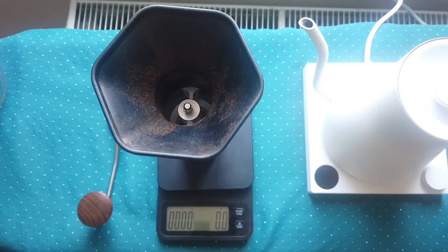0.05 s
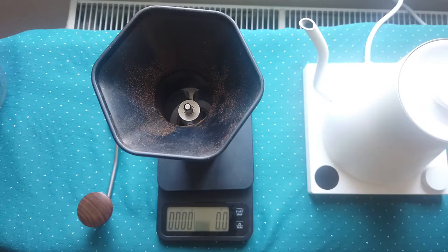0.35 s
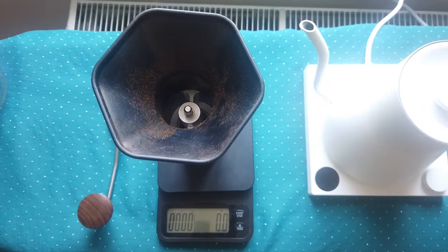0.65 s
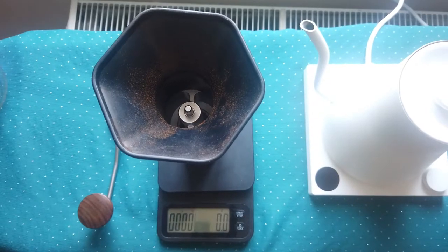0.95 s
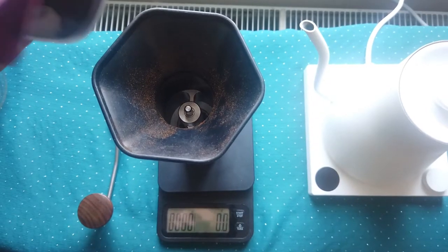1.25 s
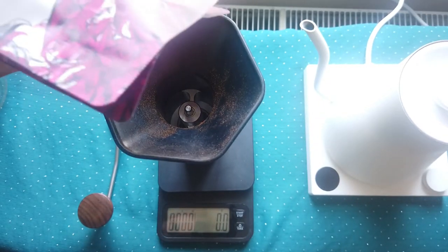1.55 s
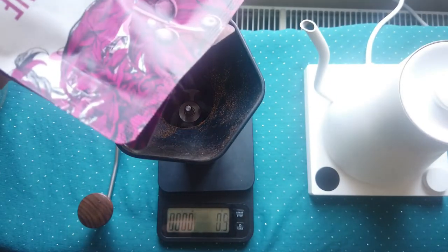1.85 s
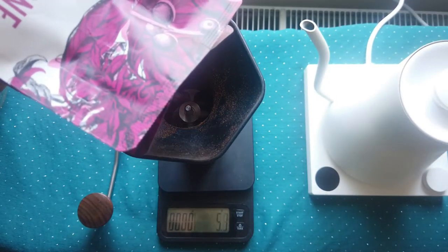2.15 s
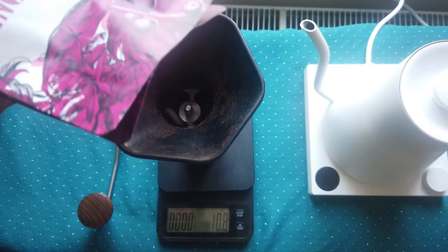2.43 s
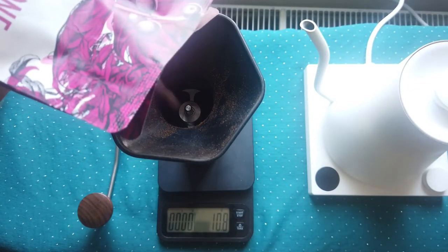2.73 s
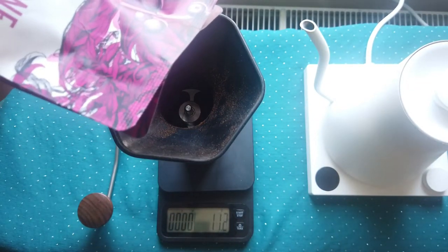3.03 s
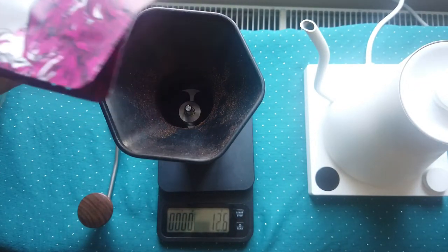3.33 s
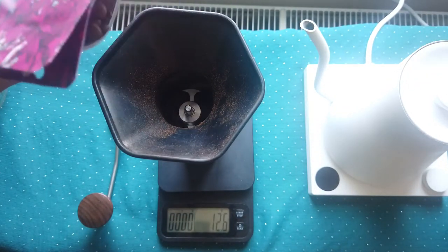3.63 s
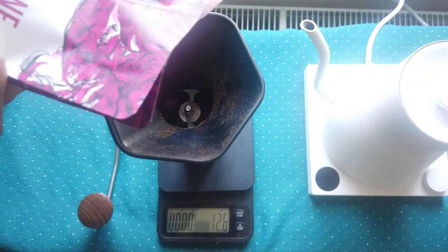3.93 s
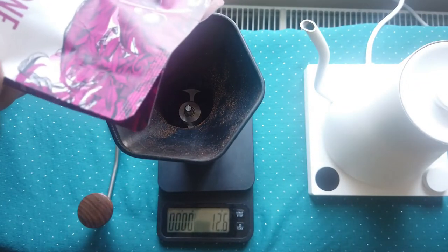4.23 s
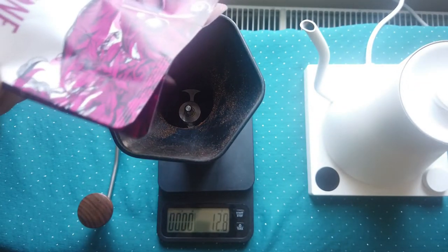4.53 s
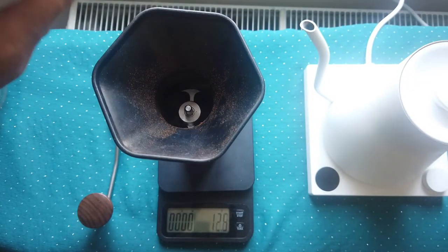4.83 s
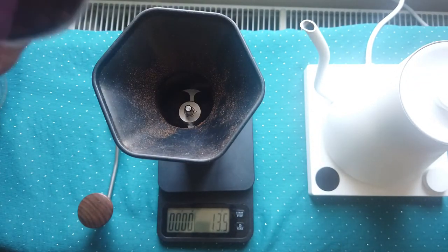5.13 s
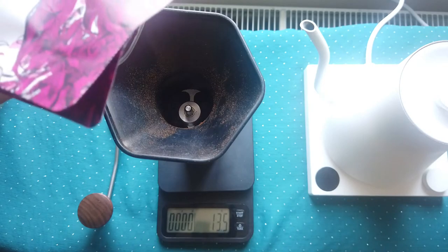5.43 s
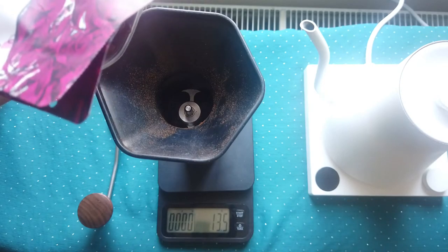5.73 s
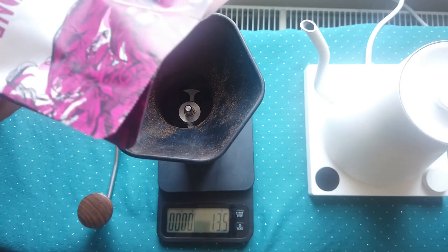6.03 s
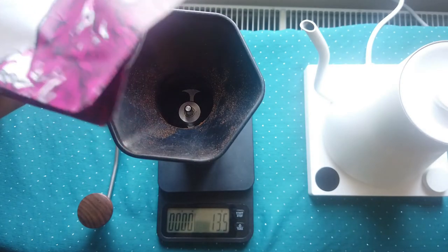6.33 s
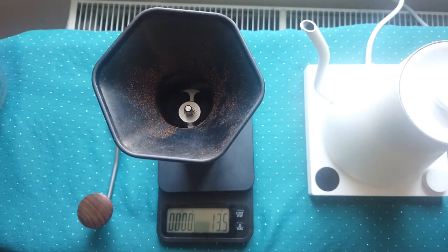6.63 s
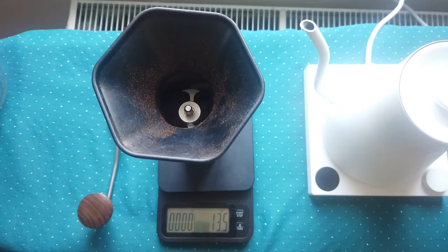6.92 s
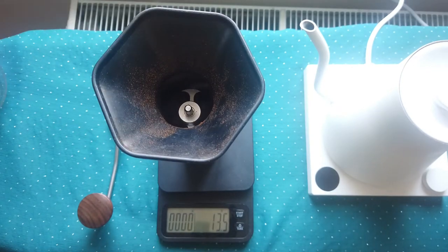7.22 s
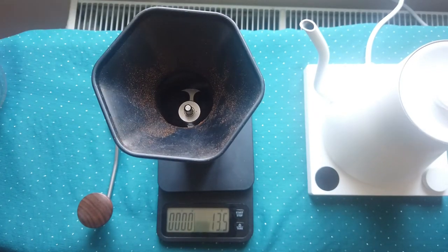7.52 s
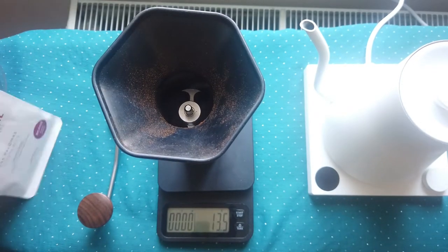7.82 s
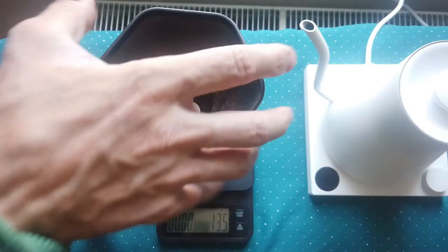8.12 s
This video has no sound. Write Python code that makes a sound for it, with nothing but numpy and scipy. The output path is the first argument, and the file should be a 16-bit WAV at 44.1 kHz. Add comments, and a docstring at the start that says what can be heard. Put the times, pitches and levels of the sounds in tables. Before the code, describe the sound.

Coffee beans patter into a plastic funnel in one pour and a few shakes, with foil bag crinkling before and after.

```python
"""Pouring coffee beans from a foil bag

A foil-lined bag is picked up and tipped over the funnel of a hand grinder, close to the microphone
in a quiet kitchen. Its folds buckle with snaps, small creases crinkle and the air inside resonates.
Beans slide out in one long pour and a few short shakes, striking the funnel and the steel burr, and
the bag is folded and put down. Beneath it all, the table and the microphone stand rumble softly."""
import sys
import numpy as np
from scipy import signal
from scipy.fft import rfft, irfft, next_fast_len
from scipy.io import wavfile
from scipy.ndimage import uniform_filter1d

SR = 44100
rng = np.random.default_rng(int(sys.argv[2]) if len(sys.argv) > 2 else 0)


def to_wav(s):
    """Save 16-bit WAV."""
    ch = np.atleast_2d(s).T  # columns
    pcm = np.round(np.clip(ch, -1, 1) * 32767)  # PCM
    wavfile.write(sys.argv[1], SR, pcm.astype(np.int16))


N = 360297
TIME = np.arange(N) / SR
CONTACT_TIME = TIME[:3200] - TIME[400]   # seconds from the peak of one short contact
STRAIN_S = .002   # a contact builds up this long before it sounds

# Stereo width at the microphone ports. Each row: frequency in Hz, side over mid in dB.
STEREO_WIDTH = [(60, -19), (200, -7.5), (400, -12), (700, -6), (1300, -5), (2400, -3), (4400, 0),
                (8000, 0.5)]
# Spectra of the background. Each row: frequency in Hz, relative level in dB.
AIR_SPECTRUM = [(130, 5.5), (200, -8.5), (320, -7), (600, -12.5), (1200, -15), (2500, -18.5), (4000, -26.5),
                (7000, -26.5), (11000, -33.5), (15500, -34.5)]
STAND_SPECTRUM = [(12, -27.5), (25, -18), (35, -8), (44, -1), (52, -8), (65, -23), (120, -43), (400, -82.5)]
TABLE_SPECTRUM = [(30, -34), (65, -20.5), (78, -4), (87, 0), (97, -4), (115, -23.5), (200, -46),
                  (600, -68.5)]
# Jolts to the stand and the table. Each row: start in seconds, length in seconds, level in dB.
STAND_JOLTS = [(.11, 0.063, -64.5), (.5, .08, -53), (.68, 0.31, -58), (.98, 0.056, -52.5),
               (1.27, 0.38, -51), (1.75, 0.066, -48), (2.25, 0.43, -65), (2.88, .15, -60),
               (3.52, 0.033, -60), (3.95, 0.07, -60.5), (4.3, 0.25, -66), (5.82, .06, -71),
               (6.13, .35, -66), (6.62, 0.34, -62.5), (6.95, .21, -49), (7.24, 0.055, -52),
               (7.6, .04, -55.5), (7.83, 0.037, -60)]
TABLE_JOLTS = [(.17, 0.18, -70), (.48, 0.074, -66.5), (.7, .15, -69), (.97, .19, -65), (1.68, .15, -66),
               (3.13, .15, -69), (3.38, 0.037, -57.5), (3.52, 0.031, -60), (3.62, 0.49, -68.5),
               (4.3, 0.053, -54), (4.44, .06, -69), (4.57, 0.25, -60.5), (4.9, 0.13, -65.5),
               (5.24, 0.06, -64.5), (5.33, .12, -72), (5.58, 0.069, -59), (5.86, 0.63, -71),
               (6.66, 0.026, -60), (7.17, 0.026, -72), (7.6, .08, -63.5), (7.84, 0.42, -68.5)]
# How hard the hands work the foil in each move. Each row: time in seconds, effort in dB.
PICKING_UP_EFFORT = [(0.0, -75.5), (0.208, -79), (0.336, -64.5), (0.496, -53), (0.59, -51.5), (0.688, -53),
                     (0.904, -55), (0.95, -73)]
TIPPING_EFFORT = [(0.96, -64), (1.094, -59), (1.278, -49), (1.446, -60.5), (1.682, -74), (1.834, -60),
                  (1.87, -66)]
FOLDING_EFFORT = [(6.45, -86), (6.568, -81), (6.69, -48), (6.724, -50), (6.782, -44), (6.866, -49.5),
                  (7.038, -52), (7.294, -56.5), (7.404, -57), (7.6, -65.5)]
PUTTING_DOWN_EFFORT = [(7.61, -53), (7.712, -57), (7.822, -60), (7.87, -66), (7.972, -52), (8.022, -68),
                       (8.17, -78)]
# Spectra of creases, hollow bag and fine crackle. Each row: frequency in Hz, relative level in dB.
CRINKLE_SPECTRUM = [(300, -25), (700, -3.5), (1000, -3.5), (1400, -3), (2100, -3.5), (2900, -6.5),
                    (3800, -12.5), (5500, -17), (7000, -31.5), (15000, -35.5)]
BODY_SPECTRUM = [(70, -26.5), (140, -9), (220, -13.5), (330, -2), (480, 2.5), (680, -5), (900, -14.5),
                 (1500, -30), (5000, -57.5)]
CRACKLE_SPECTRUM = [(1500, -11), (4000, -1), (6000, -0.5), (8000, 0), (11000, -6), (12500, -10.5),
                    (15500, -15.5)]
# Patches of foil crumpling at once. Each row: peak time in seconds, relative levels of crinkle and
# of crackle in dB, rise and fall in seconds.
FOIL_SCRUNCHES = [(0.125, -81, -76, 0.0077, .02), (0.25, -58, -70, 0.039, 0.023),
                  (0.299, -51, -65, 0.0058, 0.015), (0.363, -44, -64.5, .005, .012),
                  (0.387, -34, -45, 0.017, 0.028), (0.479, -41, -49, 0.0045, 0.022),
                  (0.549, -36.5, -43.5, 0.018, 0.018), (0.645, -51.5, -53.5, 0.0055, 0.043),
                  (0.731, -41.5, -56, 0.0042, 0.027), (0.89, -57, -53, 0.0032, 0.0072),
                  (0.977, -44, -66, 0.0032, 0.0039), (1.017, -56, -61.5, 0.025, 0.016),
                  (1.155, -54, -59.5, 0.026, 0.025), (1.26, -50, -58, .02, 0.0095),
                  (1.387, -45.5, -60.5, 0.052, 0.062), (1.672, -43, -64, 0.0082, 0.016),
                  (1.6, -52, -86, 0.023, 0.035), (1.729, -40, -51.5, 0.027, 0.081),
                  (1.821, -43.5, -57.5, .03, 0.032), (3.512, -76, -100, .004, .012),
                  (3.925, -52.5, -60, 0.0062, 0.027), (4.626, -56, -84.5, 0.0094, 0.022),
                  (4.666, -53.5, -58, 0.0068, 0.012), (4.93, -64, -94, 0.065, 0.15),
                  (5.095, -63, -91.5, 0.017, 0.0084), (6.582, -41, -58, 0.016, 0.013),
                  (6.621, -40.5, -56, 0.0032, 0.06), (6.751, -37, -47, 0.054, 0.0074),
                  (6.905, -44.5, -56, 0.015, 0.016), (6.955, -46, -49.5, 0.023, 0.012),
                  (7.065, -47, -46.5, 0.011, 0.02), (7.105, -48.5, -56, 0.037, 0.0096),
                  (7.271, -60, -51, 0.006, 0.018), (7.41, -82.5, -59, 0.0069, 0.017),
                  (7.621, -42.5, -55, 0.0074, 0.024), (7.708, -67, -52, 0.0053, 0.0073),
                  (7.977, -42, -46.5, 0.0088, 0.022)]
# Folds snapping over. Each row: time in seconds, relative level in dB, pitch in Hz, relative levels
# of edge click and of crack in dB, flutter decay in seconds.
FOLD_SNAPS = [(0.16, -41.5, 2440, -41, -22.5, 0.022), (0.352, -23.5, 1660, -42, -26, 0.0043),
              (0.384, -19.5, 1150, -30.5, -13, 0.0035), (0.394, -29.5, 615, -24, -18, 0.017),
              (0.466, -23, 1520, -26, -16, 0.0042), (0.535, -17, 660, -11.5, -24, 0.0048),
              (0.543, -43, 527, -19, -28, 0.0016), (0.58, -19, 1530, -44, -24.5, 0.0039),
              (0.735, -20, 1430, -15.5, -22.5, 0.0015), (0.805, -25, 760, -12, -21, 0.0099),
              (1.074, -29.5, 1560, -27, -45, 0.0014), (1.124, -23.5, 2000, -24, -19, 0.0045),
              (1.204, -30, 315, -13, -29, 0.0048), (1.219, -29.5, 1290, -31, -21, 0.003),
              (1.227, -40, 1330, -23, -10.5, 0.0035), (1.255, -26, 1160, -7, -16, 0.0051),
              (1.343, -20.5, 726, -14.5, -30, 0.002), (1.547, -37, 2680, -35, -38, 0.0025),
              (3.937, -35.5, 1460, -14, -30.5, 0.0024), (4.2, -53.5, 660, -6, -25, 0.0041),
              (4.644, -38.5, 2640, -27, -22.5, 0.0035), (4.877, -47, 790, -13.5, -28, 0.0042),
              (4.936, -31, 630, -14, -32, 0.0016), (6.527, -29.5, 880, -18, -35, 0.0022),
              (6.641, -26.5, 650, -13.5, -17, 0.022), (6.692, -28, 2140, -10, -28, 0.0048),
              (6.7, -15.5, 1610, -17, -28, 0.0033), (6.726, -19.5, 1990, -23, -19.5, 0.0026),
              (6.747, -22.5, 1960, -31, -10.5, 0.0042), (6.806, -18.5, 2030, -8.5, -13, 0.0061),
              (6.904, -25.5, 2170, -24, -20, 0.0039), (6.954, -33.5, 400, -6, -6.5, 0.0042),
              (7.024, -25, 1650, -24, -45, 0.0023), (7.06, -29.5, 2550, -12, -9, 0.0021),
              (7.162, -26, 1690, -5.5, -44, 0.0023), (7.188, -24, 1410, -50, -26.5, 0.0064),
              (7.275, -35, 2160, 0.5, -6.5, 0.0014), (7.381, -29, 1540, -17, -43, 0.0018),
              (7.4, -37, 905, -15, -27, 0.0068), (7.511, -35.5, 890, -10.5, -30, 0.0026),
              (7.618, -30.5, 780, -21, -23.5, 0.0025), (7.663, -28, 1890, -40, -21.5, 0.0014),
              (7.711, -26.5, 1800, -42, -18.5, 0.0013), (7.746, -33.5, 1430, -35, -21, 0.015),
              (7.821, -36.5, 800, -20.5, -47, 0.018), (7.921, -31, 1940, -37, -33, 0.0045)]
# Air ringing in the bag. Each row: peak time in seconds, pitch in Hz, level in dB, rise and fall
# in seconds.
CAVITY_RINGS = [(0.545, 184, -55, 0.0015, 0.038), (0.545, 554, -32, .005, 0.0023),
                (0.762, 754, -46.5, 0.013, 0.03), (0.80, 596, -49, 0.047, 0.039),
                (1.189, 153, -58, 0.0608, 0.03), (1.23, 1220, -38.5, 0.01597, 0.014),
                (1.365, 665, -52, 0.026, 0.14), (1.825, 610, -48, 0.072, 0.042),
                (3.882, 480, -69, 0.0057, 0.014), (3.895, 840, -67.5, 0.014, 0.03),
                (3.932, 1520, -51, 0.011, 0.017), (3.942, 620, -53.5, 0.013, 0.015),
                (4.249, 1860, -58.5, 0.0055, 0.0082), (4.349, 351, -70.5, 0.04, 0.037),
                (4.882, 874, -61, 0.011, 0.025), (4.939, 607, -44.5, 0.0071, 0.0044),
                (4.964, 480, -59.5, 0.014, 0.019), (4.96, 755, -61.5, .012, 0.035),
                (5.097, 975, -68.5, 0.0099, 0.012), (6.531, 1010, -50.5, 0.0078, 0.0074),
                (6.721, 266, -51, 0.071, 0.032), (6.811, 437, -44, 0.0027, 0.0057),
                (6.92, 458, -53.5, 0.034, 0.17), (7.192, 410, -44, 0.0016, 0.0039),
                (7.63, 288, -65, 0.0094, 0.094), (7.779, 2060, -53.5, 0.042, 0.02)]
# Beans striking funnel and burr. Each row: time in seconds, relative level in dB, ping over tick in dB.
BEAN_IMPACTS = [(1.851, -36, -8), (1.889, -29.5, 0), (1.9276, -32, 3), (1.9693, -30, 1.5),
                (2.062, -34.5, 3), (2.1018, -29.5, 2), (2.1236, -49, 10), (2.14, -35, 10.5),
                (2.162, -51, -2), (2.1984, -31.5, 1), (2.237, -29.5, -4), (2.2953, -33.5, -6),
                (2.329, -36, -6), (2.3382, -32.5, -6), (2.4022, -33, -15), (2.4284, -33, -12),
                (2.4397, -41, -6), (2.5146, -40, -3), (2.532, -53, 1), (2.563, -36, -5), (2.606, -46, -10),
                (2.8866, -41, -11), (2.903, -41, -7), (2.972, -55.5, -19), (3.0732, -43, -9),
                (3.1002, -35, 0.5), (3.133, -45.5, -4), (3.1774, -48, -15), (3.2212, -36.5, -29),
                (3.2715, -35, -19), (3.3437, -32.5, -3), (4.047, -49, 5), (4.0952, -41, -21),
                (4.1285, -44, -20), (4.2824, -37, -23), (4.3107, -42.5, -26), (4.697, -31, -2),
                (4.733, -36, 3), (4.782, -47, -13)]
# Spectra of beans ticking, sliding and knocking. Each row: frequency in Hz, relative level in dB.
TICK_SPECTRUM = [(300, -20.5), (700, -2), (2000, -1), (5000, 1.5), (8000, -0.5), (12000, 0.5), (16000, -2)]
SLIDE_SPECTRUM = [(900, -32), (2500, -8.5), (3800, 0), (4700, -4.5), (7000, -2), (9000, 2.5), (12000, 2),
                  (13200, -0.5), (16000, -3)]
KNOCK_SPECTRUM = [(250, -30), (480, -8.5), (620, -8), (1700, 4.5), (2600, -4.5), (4000, -3.5),
                  (9000, -42.5)]
# One long pour, then short shakes. Each row: start in seconds, length in seconds, relative levels of
# sliding on foil and of knocking in the funnel in dB.
POURS = [(1.86, 0.59, -47, -55.5), (2.327, 0.0082, -49, -71), (2.467, 0.02, -59.5, -65),
         (2.517, 0.0038, -55.5, -63), (2.565, 0.011, -51, -65.5), (2.865, 0.025, -49.5, -63.5),
         (2.961, 0.047, -85, -71.5), (3.038, 0.031, -62, -64), (3.12, 0.064, -63, -64),
         (3.22, 0.025, -53.5, -57.5), (3.268, 0.045, -46, -57), (3.342, 0.007, -45, -71),
         (4.034, 0.022, -54, -62), (4.125, 0.0036, -68, -71), (4.245, 0.0079, -58.5, -63),
         (4.282, 0.047, -69, -70.5), (4.692, 0.054, -47, -61), (4.784, 0.0035, -62, -72)]
# Resonances of the funnel. Each row: frequency in Hz, bandwidth in Hz, relative gain in dB.
FUNNEL_MODES = [(620, 78, -6.5), (892, 43, 5.5), (1160, 82, -4), (1520, 48, -25), (1820, 93, -13),
                (2290, 120, -15), (2710, 160, 4.5), (3665, 120, 4.5)]
# A finger rubbing the foil. Each row: start in seconds, length in seconds, pitch in Hz, level in dB.
FINGER_SQUEAKS = [(3.8, .055, 1630, -85), (6.263, .018, 1600, -77.5), (6.325, 0.023, 1510, -81)]


def from_db(db):
    return 10 ** (np.asarray(db) / 20)


def rms_one(x):
    return x / np.sqrt(np.mean(x ** 2) + 1e-30)


def running_power(x, samples):
    return uniform_filter1d(np.mean(x ** 2, axis=0), size=samples)


def peak_one(x):
    """Normalisation: the loudest millisecond of a burst gets rms 1."""
    return x / np.sqrt(running_power(x, 44).max())


def colour(x, spectrum):
    """A minimum-phase filter imposes the spectrum causally."""
    size = 2 * next_fast_len(x.shape[-1] // 2 + 2048)
    hz, db = np.transpose(spectrum)
    curve = np.interp(np.log(np.arange(size // 2 + 1) * SR / size + 1), np.log(hz), db)
    cepstrum = irfft(np.log(from_db(curve)))[:size // 2]
    cepstrum[1:] *= 2
    return irfft(rfft(x, size) * np.exp(rfft(cepstrum, size)))[..., :x.shape[-1]]


def band(x, low_hz, high_hz, order=2):
    sections = signal.butter(order, [low_hz, min(high_hz, .45 * SR)], "band", fs=SR, output="sos")
    return signal.sosfilt(sections, x)


def stereo_noise(size):
    """Coherence falls with frequency: noise is alike at both ports in the bass, unrelated in the treble."""
    mid, side = rng.standard_normal((2, size))
    return mid + colour(side, STEREO_WIDTH) * [[1], [-1]]


def add(out, s, sound):
    start = round(s * SR)
    out[:, start:start + sound.shape[-1]] += sound[:, :N - start]


def swell(t, rise_s, fall_s):
    """Exponential growth up to t = 0, exponential decay after it."""
    return np.exp(np.maximum(np.minimum(t / rise_s, -t / fall_s), -40))


def held(start_s, length_s, attack_s, release_s, sag_db_per_s=0):
    """An exponential attack and release enclose a hold that may sag."""
    hold = np.clip(TIME - start_s, 0, length_s)
    return swell(TIME - start_s - hold, attack_s, release_s) * from_db(-sag_db_per_s * hold)


def decaying(impulses, decay_s):
    """Leaky integration gives each impulse an exponential tail."""
    return signal.lfilter([1], [1, -np.exp(-1 / (decay_s * SR))], impulses + 1e-9)


def grains(spectrum, per_s, spread_db, decay_s):
    """Shot noise: tiny random contacts of uneven size add in power; loudness is evened out, rms 1."""
    sizes = from_db(spread_db * np.minimum(rng.exponential(1, N), 4))
    contacts = sizes * (rng.random(N) < per_s / SR)
    power = decaying(contacts ** 2, decay_s / 2)
    power = power / uniform_filter1d(power, size=1300)
    return rms_one(colour(stereo_noise(N) * np.sqrt(power), spectrum))


def room_air(level_db=-76):
    """The air of the room is stationary noise, strongest in the bass."""
    return from_db(level_db) * rms_one(colour(stereo_noise(N), AIR_SPECTRUM))


def jolt_envelope(jolts, rest_db, attack_s=.053, release_s=.048):
    """Incoherent vibrations, here a resting tremor and the jolts, add in power."""
    power = sum((from_db(db) * held(s, length_s, attack_s, release_s)) ** 2 for s, length_s, db in jolts)
    return np.sqrt(from_db(rest_db) ** 2 + power)


def sway(spectrum):
    """Random forcing drives a low resonance, its loudness evened out."""
    motion = colour(stereo_noise(N), spectrum)
    return motion / np.sqrt(running_power(motion, 4000))


def rumble(coupling_db=-21.5):
    """Jolted, stand and table each hum at their own resonance; coupling lets the stand stir the table."""
    stand = jolt_envelope(STAND_JOLTS, rest_db=-71)
    table = np.hypot(jolt_envelope(TABLE_JOLTS, rest_db=-82), from_db(coupling_db) * stand)
    return stand * sway(STAND_SPECTRUM) + table * sway(TABLE_SPECTRUM)


def effort(move, firm_grip_db=-50):
    """The driving effort of the hands acts as a gain: 1 for a firm grip, 0 outside the move."""
    times, db = np.transpose(move)
    return from_db(np.interp(TIME, times, db) - firm_grip_db) * (TIME >= times[0]) * (TIME <= times[-1])


def crinkling(scrunch_db=-3, scrunch_body_db=-14):
    """Small creases buckle and the hollow bag answers lower down; more effort is louder and brighter."""
    moves = PICKING_UP_EFFORT, TIPPING_EFFORT, FOLDING_EFFORT, PUTTING_DOWN_EFFORT
    work = sum(effort(move) for move in moves) + 1e-9
    crinkle = from_db(-53) * work
    body = from_db(-57) * work ** .94   # the exponent is dB gained per dB of effort
    crackle = from_db(-66) * work ** 1.3
    for s, crinkle_db, crackle_db, rise_s, fall_s in FOIL_SCRUNCHES:
        crush = from_db(scrunch_db) * swell(TIME - s, rise_s, fall_s)
        crinkle += from_db(crinkle_db) * crush
        body += from_db(crinkle_db + scrunch_body_db) * crush
        crackle += from_db(crackle_db) * crush
    return (crinkle * grains(CRINKLE_SPECTRUM, per_s=1200, spread_db=3.5, decay_s=.0079)
            + body * grains(BODY_SPECTRUM, per_s=600, spread_db=8, decay_s=.026)
            + crackle * grains(CRACKLE_SPECTRUM, per_s=4100, spread_db=3.5, decay_s=.0023))


def fold_snaps(flutter=.074, band_ratio=2.3, edge_gain_db=5, crack_gain_db=3, gain_db=-7):
    """Snap-through buckling: a fold flips, its panel flutters, its edge clicks and the crease cracks."""
    out, t = np.zeros((2, N)), CONTACT_TIME
    for s, db, hz, edge_db, crack_db, decay_s in FOLD_SNAPS:
        push = (t == 0) + flutter * stereo_noise(len(t)) * swell(t, .0012, decay_s)
        panel = band(push, hz / band_ratio, hz * band_ratio, order=1)
        panel = peak_one(band(panel, 230, np.clip(2.7 * hz, 1000, 3300), order=4))
        edge = from_db(edge_db + edge_gain_db) * peak_one(band(push, 1900, 5200, order=6))
        burst = stereo_noise(len(t)) * swell(t, rise_s=.0023, fall_s=.0077)
        crack = from_db(crack_db + crack_gain_db) * peak_one(colour(burst, CRACKLE_SPECTRUM))
        add(out, s + STRAIN_S + t[0], from_db(db + gain_db) * (panel + edge + crack))
    return out


def panel_echo(x, delay_s=.002, wander=.25, reflection=.28):
    """Comb filtering: the bag's limp far panel returns the sound inverted, over a changing distance."""
    moments = np.arange(0, TIME[-1], .12)
    drift = np.interp(TIME, moments, rng.standard_normal(len(moments)))
    travel_s = delay_s * np.exp(wander * drift)
    echo = np.array([np.interp(TIME - travel_s, TIME, channel) for channel in x])
    return x - reflection * echo


def bag_cavity(quality_factor=3.7):
    """Cavity resonance: rubbing makes the air in the bag ring at a pitch set by how it is squeezed."""
    out, t = np.zeros((2, N)), TIME[:SR // 2] - TIME[SR // 5]
    band_ratio = 1 + .5 / quality_factor
    for s, hz, db, rise_s, fall_s in CAVITY_RINGS:
        ringing = band(stereo_noise(len(t)), hz / band_ratio, hz * band_ratio)
        ringing = ringing / np.sqrt(running_power(ringing, 900) + 1e-20)
        add(out, s + t[0], from_db(db) * ringing * swell(t, rise_s, fall_s))
    return out


def bean_impacts(gain_db=-6, burr_hz=11810):
    """Impact excitation: single beans tick, rattle on and set the steel burr ringing briefly."""
    out, t = np.zeros((2, N)), CONTACT_TIME
    tap = swell(t, rise_s=.0003, fall_s=.0009)
    rattle = .17 * swell(t, rise_s=.024, fall_s=.019)
    ring = swell(t, rise_s=.00049, fall_s=.0007)
    for s, db, ping_db in BEAN_IMPACTS:
        tick = peak_one(colour(stereo_noise(len(t)) * (tap + rattle), TICK_SPECTRUM))
        cycles = burr_hz * rng.normal(1, .0125) * t + rng.random((2, 1))
        ping = from_db(ping_db) * peak_one(np.sin(2 * np.pi * cycles) * ring)
        add(out, s + STRAIN_S + t[0], from_db(db + gain_db) * (tick + ping))
    return out


def funnel(strikes_per_s=70, ring_db=-4):
    """Modal response: beans knock on the plastic funnel and excite its resonances at random; rms 1."""
    rings = 0
    for hz, width_hz, db in FUNNEL_MODES:
        strikes = from_db(2.9 * rng.standard_normal(N)) * (rng.random(N) < strikes_per_s / SR)
        force = decaying(strikes, decay_s=.001) * stereo_noise(N)
        rings += from_db(db) * signal.lfilter(*signal.iirpeak(hz, hz / width_hz, fs=SR), force)
    knocks = grains(KNOCK_SPECTRUM, per_s=800, spread_db=6, decay_s=.0065)
    return rms_one(knocks + from_db(ring_db) * rms_one(rings))


def bean_stream(knock_gain_db=-1):
    """Granular flow: beans rustle over the foil and patter into the funnel, each pour thinning out."""
    sliding = knocking = 0
    for s, length_s, foil_db, funnel_db in POURS:
        flow = held(s, length_s, attack_s=.0044, release_s=.014, sag_db_per_s=8.5)
        sliding += from_db(foil_db) * flow
        knocking += from_db(funnel_db + knock_gain_db) * flow
    rustle = grains(SLIDE_SPECTRUM, per_s=3900, spread_db=9.5, decay_s=.0078)
    return sliding * rustle + knocking * funnel()


def finger_squeaks(fall_hz_per_s=1200, fade_s=.009):
    """Stick-slip friction of skin on foil gives a faint, wavering, falling tone."""
    out = 0
    waver = 1 + .014 * rms_one(band(rng.standard_normal(N), 13, 300))
    for s, length_s, hz, db in FINGER_SQUEAKS:
        pitch_hz = (hz - fall_hz_per_s * (TIME - s)) * waver
        tone = np.sin(2 * np.pi * np.cumsum(pitch_hz) / SR)
        out += from_db(db) * held(s, length_s, fade_s, fade_s) * tone
    return out


def from_right(x, lag_samples):
    """Path difference: sound from the right reaches the left port later."""
    return np.array([np.pad(x[0], (lag_samples, 0))[:N], x[1]])


def scatter(x, wet_db=-16, t60_s=.054, top_hz=5000):
    """Scattering from things on the cloth-covered table gives a very short, dull tail."""
    t = TIME[:SR // 2]
    tail = band(stereo_noise(len(t)), 230, top_hz, order=1) * from_db(-60 * t / t60_s) * (t > .004)
    tail = tail / np.sqrt(np.sum(tail ** 2) / 2)
    return from_db(wet_db) * signal.fftconvolve(x, tail, axes=1)[:, :N]


def scene():
    """Superposition: bag and beans sound close by, over the furniture's rumble and the room's air."""
    bag = panel_echo(fold_snaps() + crinkling()) + bag_cavity() + finger_squeaks()
    beans = bean_stream() + bean_impacts()
    near = from_right(bag, lag_samples=1) + from_right(beans, lag_samples=3)
    return near + scatter(near) + rumble() + room_air()


def record(dry, port_hz=10400, port_width_hz=1000, port_gain=1.78, treble_db=-3, cutoff_hz=16000):
    """Port resonance lifts a band of high treble; a gentle shelf and a steep low-pass trim the top."""
    port = signal.lfilter(*signal.iirpeak(port_hz, port_hz / port_width_hz, fs=SR), dry)
    heard = colour(dry + port_gain * port, [(3000, .0024), (8000, treble_db)])
    return signal.sosfilt(signal.ellip(12, .2, 70, cutoff_hz, fs=SR, output="sos"), heard)


dry = scene()
out = record(dry)
to_wav(out)
```